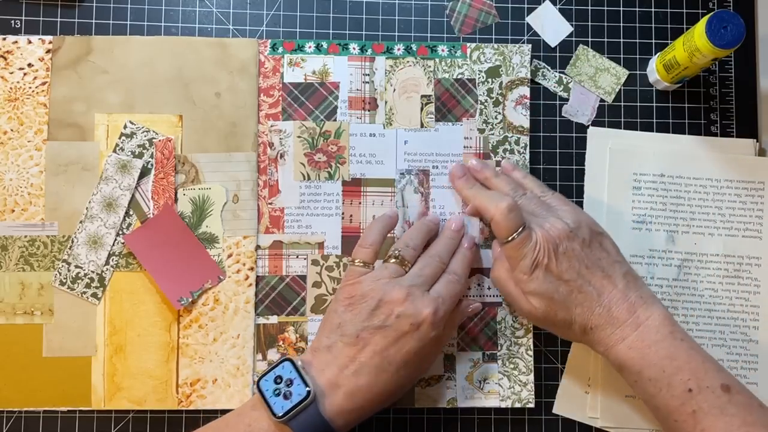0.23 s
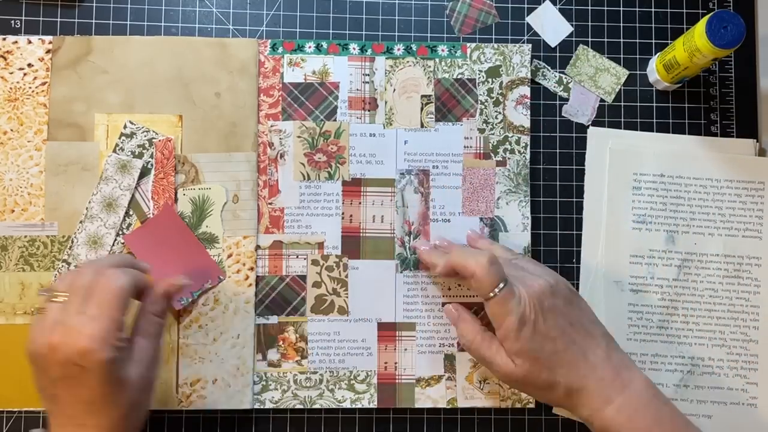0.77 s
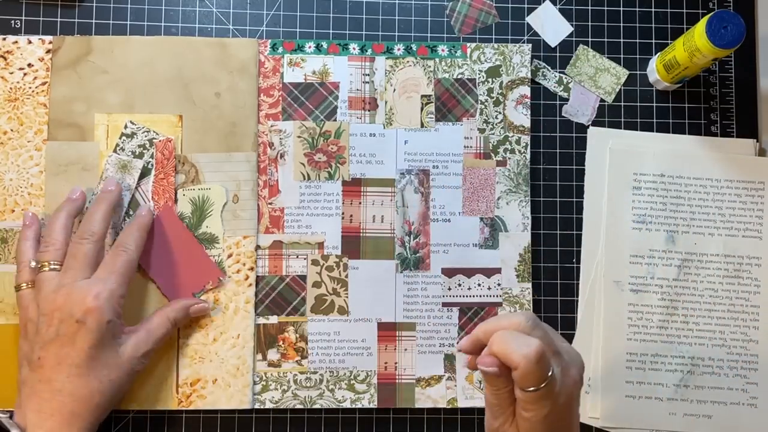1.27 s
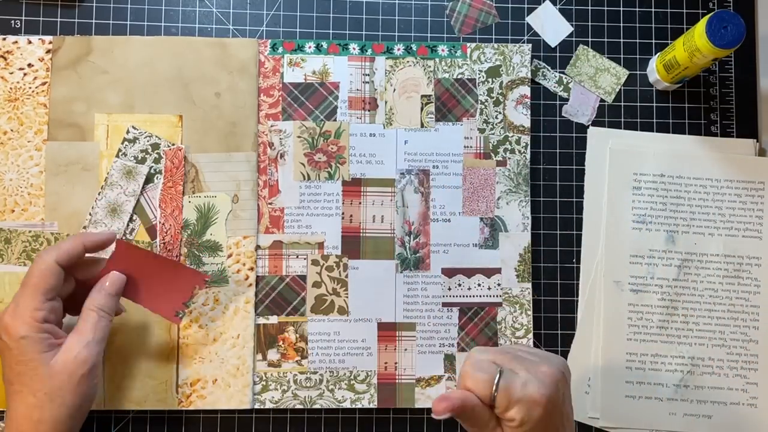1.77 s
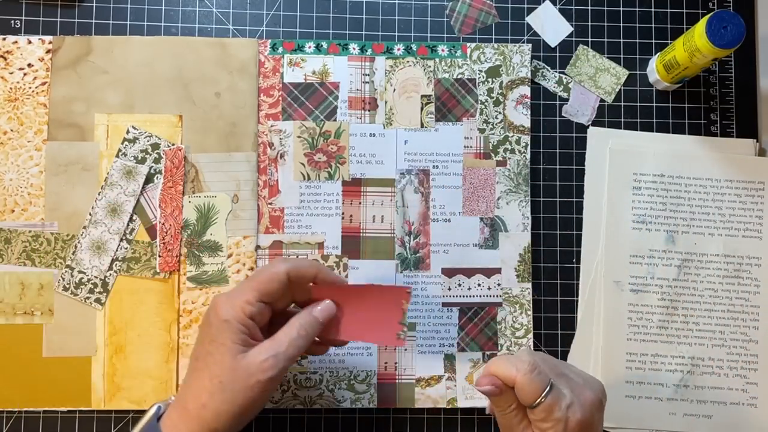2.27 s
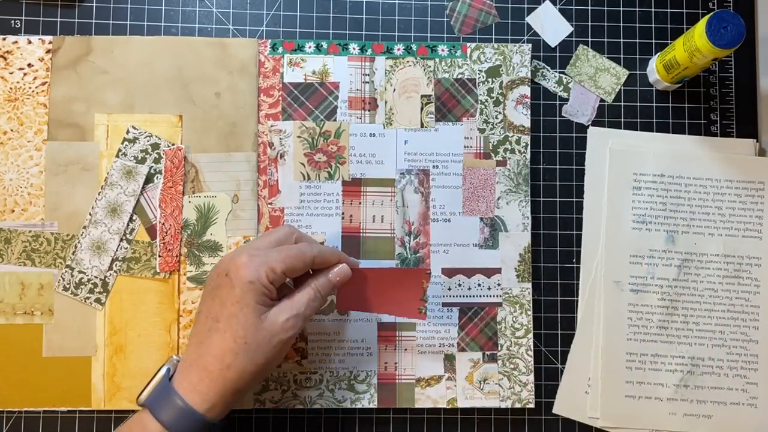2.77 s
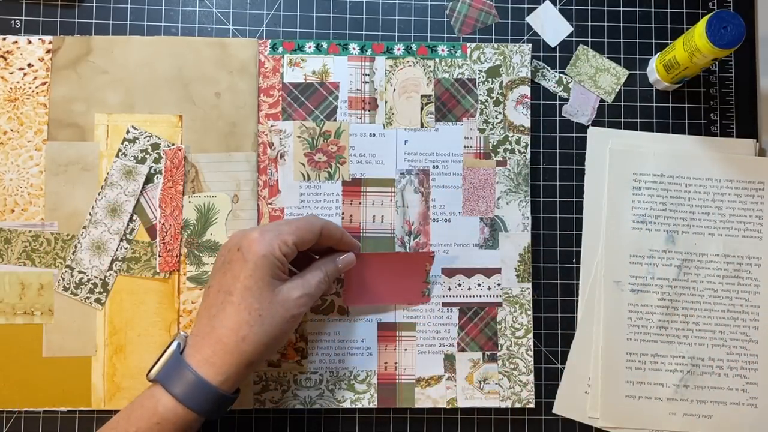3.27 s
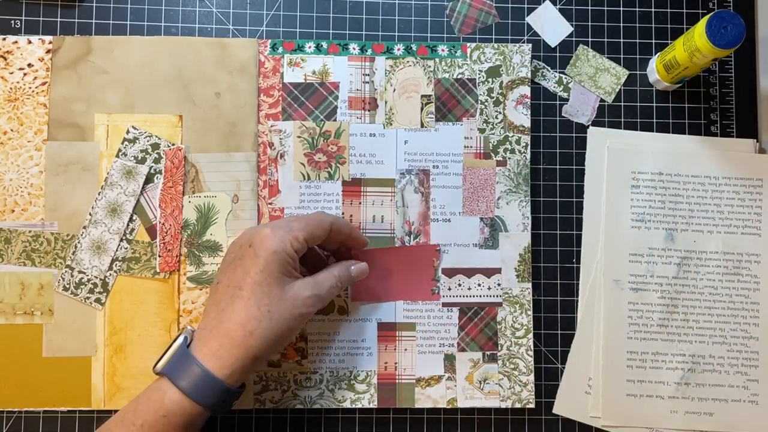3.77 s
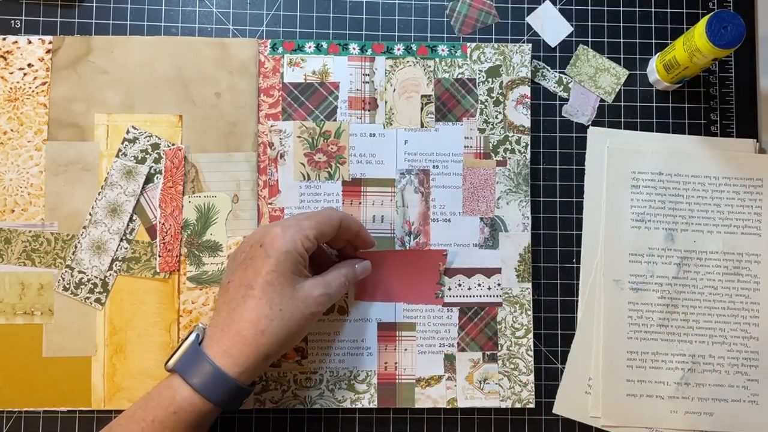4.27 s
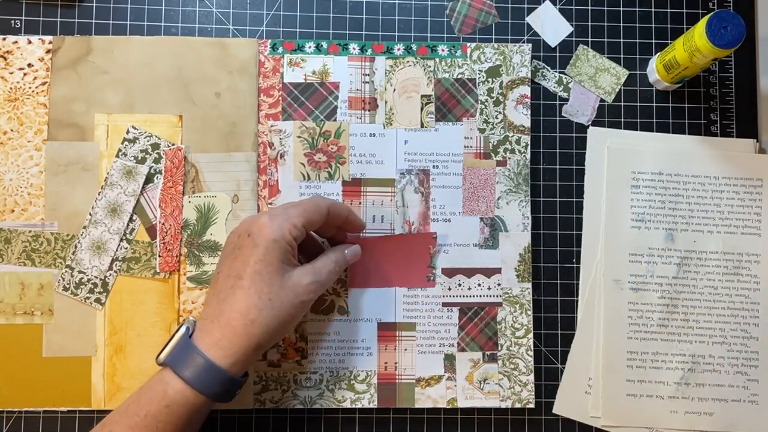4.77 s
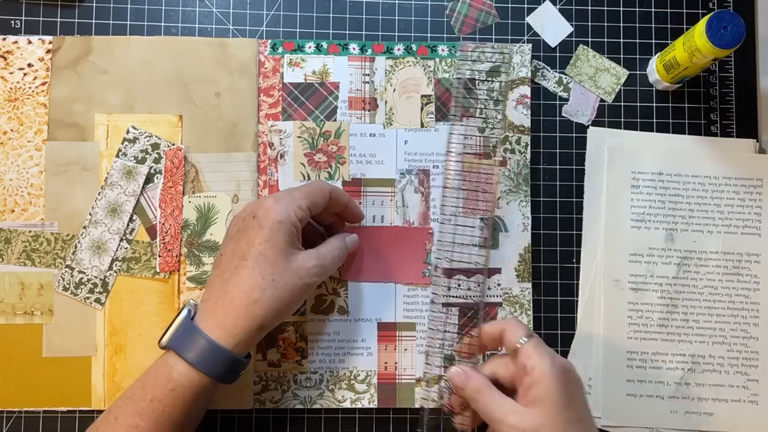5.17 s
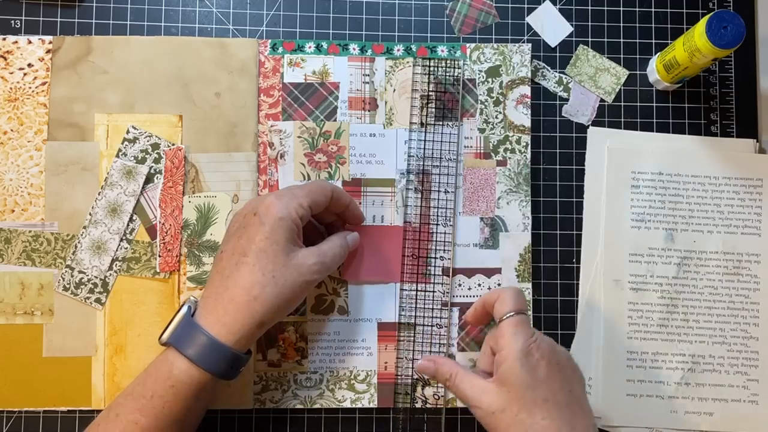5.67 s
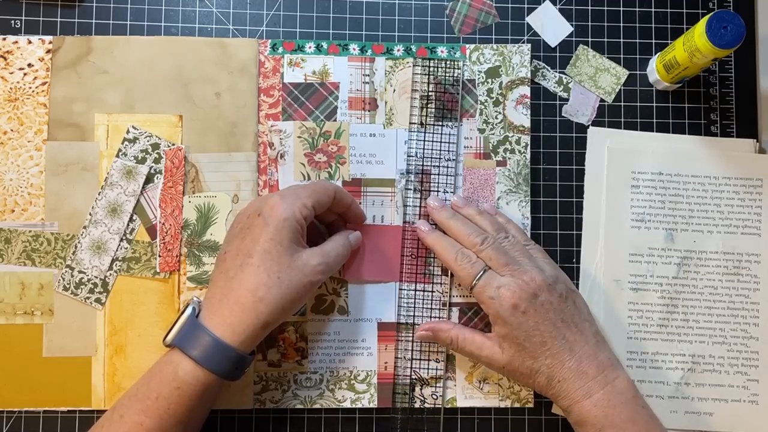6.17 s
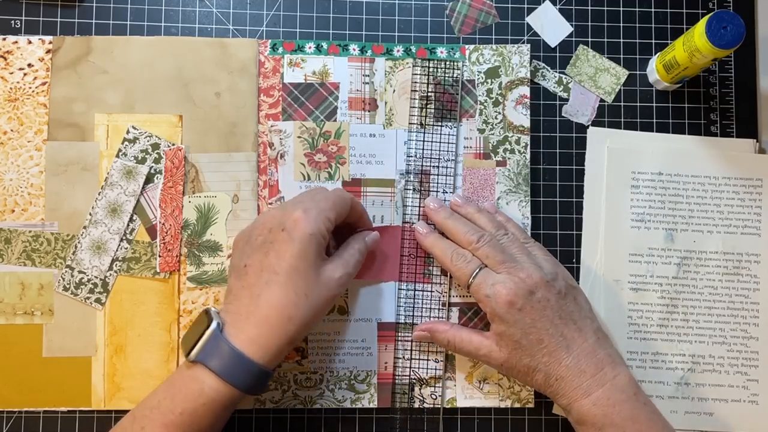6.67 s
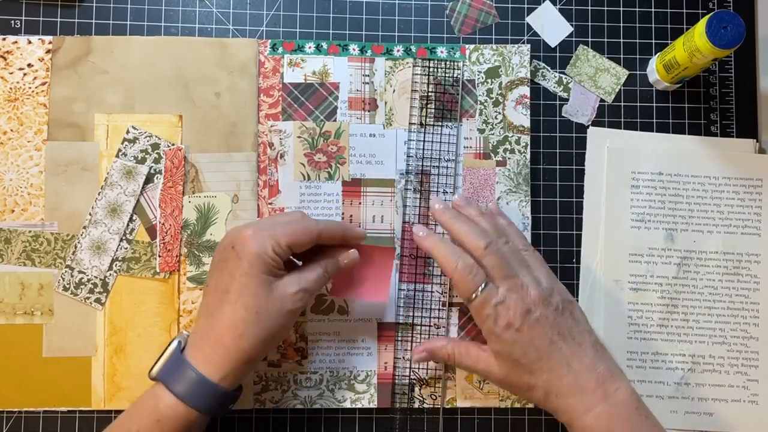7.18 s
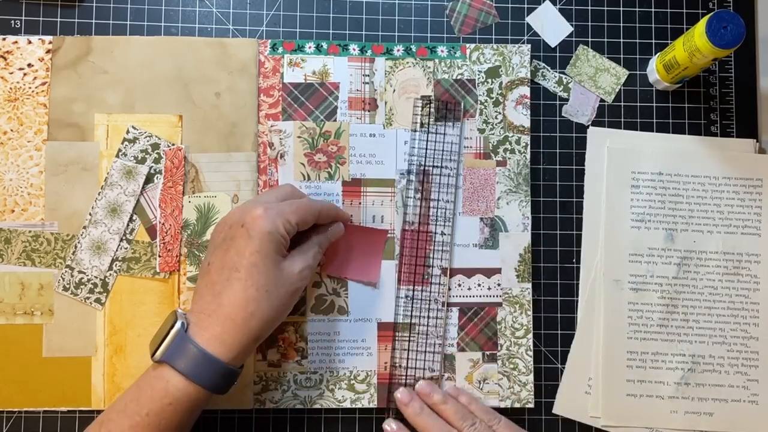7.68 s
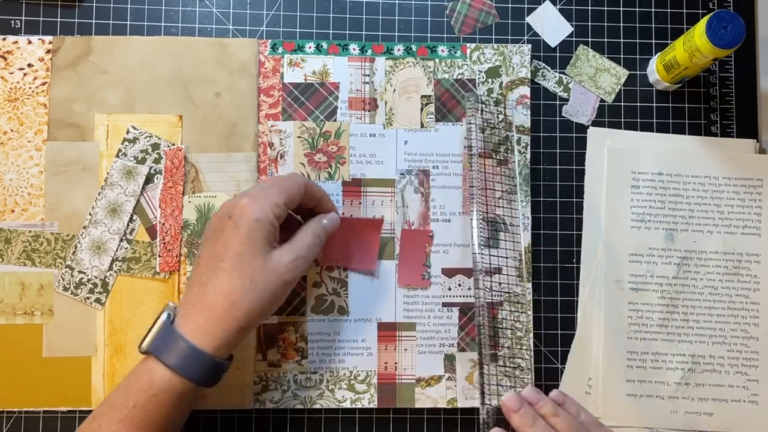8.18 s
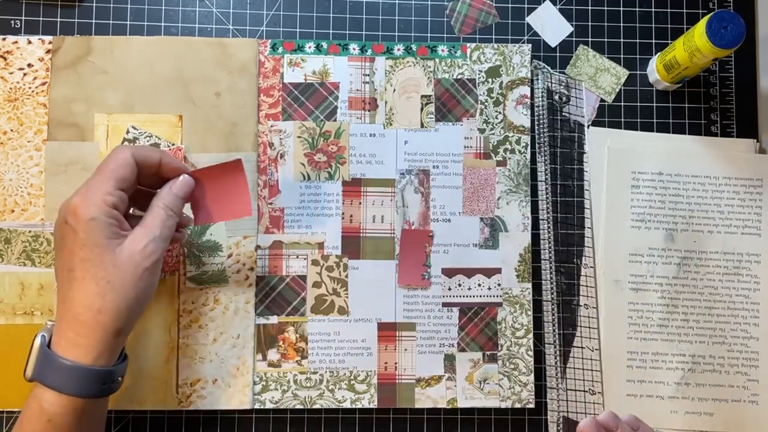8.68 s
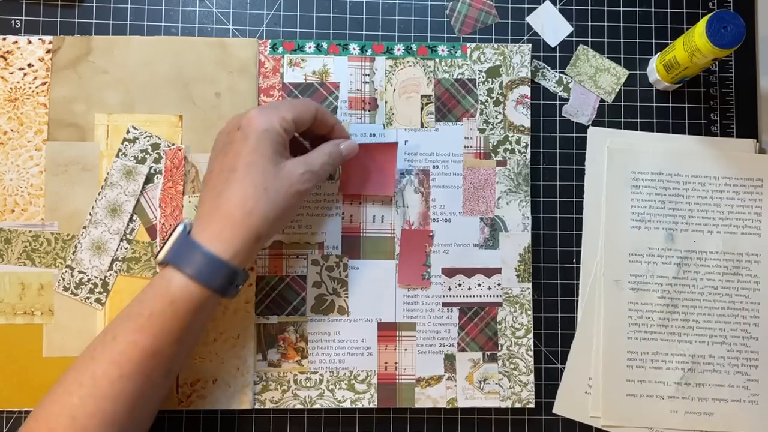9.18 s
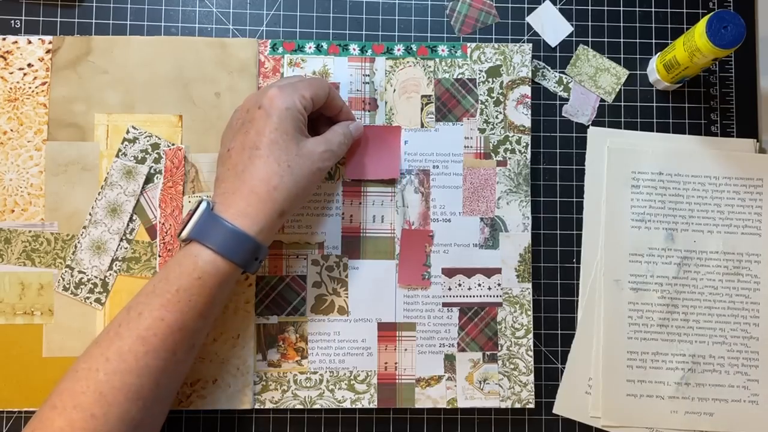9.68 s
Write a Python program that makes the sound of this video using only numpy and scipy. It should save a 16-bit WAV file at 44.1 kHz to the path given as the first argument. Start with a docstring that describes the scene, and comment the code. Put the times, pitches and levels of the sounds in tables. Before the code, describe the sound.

Close papery rubbing, sharp edge clicks and soft knocks, one short strip-tear near seven seconds, then faint slides and a final hard snap.

```python
"""Hands slide paper scraps over a collage page on a craft table, in a small quiet room with a faint hum.
First come slides (coloured noise) with scattered edge snaps, knocks and thuds (short decaying bursts).
Around 3.4 s two hard snaps stand out; a card strip is handled and a plastic ruler is laid on it.
Near 6.9 s the strip is torn off along the ruler: dense clumps of fibre clicks over a ringing card.
Lighter slides, gliding scuffs and faint ticks follow, with one more strong snap near the end."""
import sys
import numpy as np
from scipy import signal
from scipy.fft import rfft, irfft, next_fast_len
from scipy.io import wavfile
from scipy.ndimage import uniform_filter1d, map_coordinates

SR = 44100
rng = np.random.default_rng(int(sys.argv[2]) if len(sys.argv) > 2 else 0)


def unload_audio(sound):
    """Save the sound as a 16-bit wav file, at the path given as the first command line argument."""
    columns = np.transpose(np.atleast_2d(sound))
    # keep every value between -1 and 1, then stretch to whole-number steps
    steps = np.round(np.clip(columns, -1, 1) * 32767)
    wavfile.write(sys.argv[1], SR, steps.astype(np.int16))


N = 438354

# Levels in these tables are before the small trims in the mix.
# low room rumble: hz, level_db (per Hz)
ROOM_AIR = [(20, -26.5), (35, -10.5), (55, 2), (80, 0), (120, -0.5), (170, -9.5), (300, -12), (600, -20.5),
            (1200, -28), (3000, -32), (8000, -32), (13000, -38)]
# a distant appliance, average levels: pitch_hz, level_db
HUM = [(54, -77), (119.6, -75), (180, -95)]
# how long the room's answer takes to fall 60 dB: hz, t60_s
ROOM_DECAY = [(100, 0.46), (600, 0.14), (3000, 0.14), (7000, 0.13), (13000, 0.068)]
# microphone response: hz, gain_db
MICROPHONE = [(20, 0), (8000, 0), (9300, 2), (10400, 5), (11200, 4), (12000, -5), (12800, -15),
              (13600, -25), (15600, -28)]
# phase by which the left channel leads the right: hz, phase_radians
PORT_PHASE = [(100, 0), (1400, -.4), (2400, 0), (3300, .7), (5000, .5), (6800, 0), (8000, .55), (8750, -.2),
              (9400, -1.65), (10300, -3.14), (11700, -6.0), (12600, -6.7), (13300, -9.2)]
# weight landing on the table top: start_s, level_db
THUDS = [(0.065, -62.5), (0.45, -67.5), (2.783, -62.5), (3.423, -44.5), (3.46, -50.5), (3.6, -54.5),
         (4.467, -59.5), (4.669, -60), (5.328, -60.5), (5.635, -50), (6.98, -52.5), (9.44, -58),
         (9.731, -64.5)]
# ways the table top swings, before random detuning: pitch_hz, level_db, t60_s
TABLE_MODES = [(42, -11, .2), (60.03, -4, 0.64), (84, 0.5, 0.084), (109.9, 1, .17), (173.9, 1.5, 0.09),
               (255, -6, 0.13), (357, -7.5, 0.048), (501, -6.5, 0.019)]
# fingers, card and ruler knocking on the page: start_s, level_db (loudest 3 ms), pitch_hz
KNOCKS = [(0.128, -58, 1260), (0.147, -52, 1010), (0.166, -52, 1110), (0.234, -60.5, 590),
          (0.265, -52.5, 716), (1.28, -64, 710), (2.769, -67, 720), (3.38, -46, 1370), (3.4174, -34, 2130),
          (3.42, -35, 950), (3.423, -36, 467), (3.428, -36.5, 520), (3.443, -45, 398), (4.657, -54.5, 1010),
          (4.976, -56.5, 555), (4.977, -63.5, 1600), (5.317, -53.5, 800), (5.616, -48, 770),
          (5.6287, -44, 1420), (5.6267, -41, 552), (6.731, -54.5, 597), (6.838, -47, 655),
          (7.164, -58.5, 890), (7.738, -46.5, 862), (9.431, -55.5, 459), (9.446, -57, 413),
          (9.602, -69.5, 890), (9.696, -50.5, 1400)]
# edges tick faintly as ruler and card are shifted: start_s, end_s
HANDLING = [(5.73, 5.8), (6.345, 6.37), (9.24, 9.27)]
# paper and ruler edges snapping: start_s, crack_db, body_db and ring_db (relative to crack), ring_hz
SNAPS = [(0.1261, -48.5, -11, -16, 4330), (1.278, -51, -14.5, -23, 4390), (1.3234, -42, -28, -24, 5100),
         (1.8936, -60, -1, -3, 5300), (2.6584, -42.5, -20, -6.5, 4340), (2.6683, -38.5, -16, -8.5, 4400),
         (2.7051, -43.5, -30, -3.5, 4150), (2.7691, -46.5, -6, -23, 3860), (3.204, -48.5, -10, -15, 3740),
         (3.3792, -22, -30, -18.5, 4230), (3.4022, -17.5, -27, -21, 4300), (3.4576, -47, -7, -2.5, 3545),
         (4.4757, -36.5, -24, -27, 5010), (4.509, -38.5, -14.5, -29, 5040), (4.5989, -37.5, -21, -8, 4960),
         (4.6964, -47, -8, -5.5, 4530), (4.8966, -40, -22, -5, 4590), (5.2516, -57.5, -12, -4.5, 3480),
         (5.3168, -42, -6.5, -4.5, 4820), (5.3749, -57.5, -14, -2.5, 3620), (5.4685, -36, -21, -10.5, 4140),
         (5.5852, -54.5, -8, 2.5, 4200), (5.6151, -38.5, -8, -7, 3530), (5.6224, -38, -1.5, -9.5, 3600),
         (5.9194, -59, -7.5, -6, 5010), (6.3904, -55, -2.5, -6, 4970), (6.5195, -50, -28, -9.5, 4900),
         (6.565, -45.5, -30, -13, 4900), (6.6393, -40, -23, -18, 3720), (6.731, -50, -5.5, -23, 4270),
         (7.1237, -47, -9, -9, 4100), (7.166, -52, -1.5, -4, 4210), (7.737, -40, -12.5, -13, 4880),
         (7.9962, -56, -25, -0.5, 4600), (8.1723, -57, -22, -1, 5140), (9.424, -40.5, -7, -12.5, 4366),
         (9.4328, -41, -7, -6, 3680), (9.6039, -54, -2.5, -15, 3540), (9.695, -27.5, -11.5, -3.5, 4040)]
# bright part of a snap: hz, level_db
CRACK_SPECTRUM = [(1500, -31), (3500, -17), (5500, -2.5), (7000, 1), (9000, -1), (11500, -2.5), (14000, -4)]
# duller flap of the sheet: hz, level_db
FLAP_SPECTRUM = [(200, -19.5), (700, -11), (1400, -1.5), (2800, 3.5), (4000, -4), (8000, -19.5)]
# a bending scrap scuffs past: start_s, end_s, level_db, from_hz, to_hz, width_octaves
SCUFFS = [(1.403, 1.689, -63, 7000, 3280, 0.54), (1.624, 1.824, -77.5, 3100, 2390, 0.26),
          (2.216, 2.283, -65.5, 3400, 3620, 0.44), (2.286, 2.428, -70.5, 2180, 1950, 0.28),
          (3.381, 3.419, -47, 770, 493, 1.4), (3.523, 3.63, -61, 744, 643, 0.61),
          (6.412, 6.457, -65.5, 5470, 6960, 0.37), (7.26, 7.41, -77, 4460, 5500, 0.48),
          (6.111, 6.19, -79, 7000, 7000, 0.99), (8.014, 8.063, -62.5, 2500, 3140, 0.64),
          (8.09, 8.204, -64.5, 6140, 4340, 0.53), (8.177, 8.332, -72.5, 4640, 4100, 0.33),
          (8.409, 8.485, -63, 4480, 4440, 0.81), (8.665, 8.906, -78.5, 4584, 4880, 0.66),
          (8.949, 9.08, -71.5, 5040, 5750, 0.4), (9.096, 9.194, -71, 3960, 4200, 0.67),
          (9.232, 9.279, -73, 4600, 4080, 0.3), (9.417, 9.477, -62, 1770, 890, 1.6),
          (9.674, 9.725, -62.5, 4200, 4140, 0.26)]
# a scrap or hand slides: start_s, end_s, hiss_db, swell_db (change over the stroke), rustle_db (re hiss)
SLIDES = [(0.0, 0.135, -68.5, -1.5, -7.5), (0.137, 0.421, -59, -3.5, -15.5), (0.426, 0.598, -59, 6, -16),
          (0.608, 0.756, -55.5, 0.5, -17.5), (0.981, 1.044, -62.5, -5, -11.5),
          (1.283, 1.377, -62.5, 5, -8.5), (1.405, 1.654, -61, -10, -18), (1.655, 1.725, -78, 0, -4),
          (1.73, 1.81, -69.5, 2, -18), (1.834, 1.951, -73.5, -8, -13), (1.946, 2.068, -85.5, -9, -9),
          (2.202, 2.414, -65.5, -9, -6.5), (2.412, 2.532, -75, 5, -2), (2.606, 2.858, -67, 8, -1),
          (2.873, 3.145, -67, -5, -6), (3.152, 3.206, -58, -4.5, -4), (3.266, 3.331, -80, 1, 4),
          (3.45, 3.608, -65, 9, -3), (3.608, 3.679, -56, -3.5, -3), (3.71, 3.85, -63.5, -2, -6),
          (3.849, 3.982, -84, -3, 4), (4.33, 4.433, -75, -3, -1.5), (4.424, 4.675, -61.5, 10.5, -2),
          (4.704, 4.877, -79, -15, 2), (4.885, 4.99, -76.5, -2, -3.5), (5.11, 5.163, -74, 7, -9),
          (5.313, 5.58, -77, -5, -3), (5.575, 5.64, -63, -3, -9), (5.926, 5.988, -69.5, -3.5, -9),
          (6.412, 6.474, -71, 0, -6), (6.511, 6.769, -64.5, 0.5, -8), (7.087, 7.184, -61.5, -4.5, -9),
          (7.197, 7.228, -72, -2, -2), (7.403, 7.527, -67.5, -5, -1.5), (7.524, 7.774, -60.5, -2.5, -6),
          (7.778, 7.892, -66, 4.5, -7), (7.896, 7.981, -79.5, -2, -3), (8.212, 8.264, -74, 0.5, -2.5),
          (8.376, 8.476, -71.5, 11.5, -11), (8.609, 8.645, -75, -3.5, -2.5), (8.98, 9.058, -72, 1, -6.5),
          (9.319, 9.367, -68.5, 2, -4), (9.45, 9.7, -73.5, -2, -6.5), (9.691, 9.777, -63.5, -11, -9.5)]
# the hand presses down and rubs: middle_s, length_s, level_db
PRESSES = [(0.155, 0.27, -69.5), (0.467, 0.16, -79), (1.323, 0.16, -78.5), (2.788, 0.11, -63.5),
           (3.186, 0.048, -71), (3.564, 0.27, -55.5), (3.745, 0.21, -78), (4.465, 0.07, -68.5),
           (4.674, 0.066, -59.5), (5.622, 0.16, -70.5), (6.419, 0.085, -74), (7.455, 0.15, -70),
           (7.657, 0.39, -68)]
# high smooth part of a slide: hz, level_db (per Hz)
HISS_SPECTRUM = [(1500, -37.5), (3000, -11), (4800, -5.5), (7000, 0.5), (9000, 2.5), (11500, -0.5),
                 (13000, -13.5)]
# middle, grainier part of a slide: hz, level_db (per Hz)
RUSTLE_SPECTRUM = [(500, -30), (1000, -8.5), (1600, -0.5), (2500, -1), (4000, 0.5), (6000, -5.5),
                   (10000, -34)]
# low rub of the hand: hz, level_db (per Hz)
RUB_SPECTRUM = [(100, -18.5), (300, -2), (650, 1), (1000, -8), (1600, -10), (4000, -31.5)]
# fibres breaking in the tear: hz, level_db (per Hz)
FIBRE_SPECTRUM = [(60, -35.5), (250, -15.5), (600, -16.5), (1000, -13), (1500, -12.5), (2200, -5.5),
                  (3500, -0.5), (5000, -2), (7500, 2.5), (10000, 1.5), (12000, 4.5), (15000, 0.5)]
# resonances of the tearing edge: pitch_hz, width_hz, peak_db
TORN_EDGE = [(3163, 190, 4.5), (6030, 190, 7), (9200, 940, 4.5)]
# resonances of the freed card and the page under it: pitch_hz, width_hz, level_db
CARD_MODES = [(106, 8.5, 1), (394, 47, -12.5), (667, 74, 1), (803, 27, -12.5)]

TOP_HZ = 15900  # nothing is picked up above this
TICK_GAP_S, TICK_DB, TICK_SPREAD_DB = 0.032, -67.5, 5.5
# decay of a snap at the reference level; one harder by the halving step is half as long
SNAP_T60_S, SNAP_REF_DB, SNAP_HALVING_DB = .016, -41, 32.5
SHIVER_DB, SHIVER_T60_S = -22.5, 0.11  # the sheet shivers on after the crack
CRACKLE_S, CRACKLE_DB = .022, -24  # smaller cracks start within this time, about this much weaker
RING_WIDTH_HZ, RING_LONGER = 320, 1.7  # band reach on each side; times as long as the crack
SLIDE_ATTACK_S, SLIDE_RELEASE_S = 0.034, .05  # a stroke gets under way and comes to rest
DRAG_DB = -22  # rub added to each stroke, relative to its hiss before the mix trims
TEAR_START_S, TEAR_END_S = 6.836, 6.986
TEAR_FIRST_DB, TEAR_FULL_DB = -43, -25  # pull as the edge gives; the level it builds towards
TEAR_BUILD_S, TEAR_T60_S = .08, 0.035  # the pull gathers speed; the last fibres let go


def amp(db):
    """Turn decibels into a gain."""
    return 10 ** (np.asarray(db) / 20)


def unit(x):
    """Scale to an average strength (rms) of 1."""
    return x / np.sqrt(np.mean(x ** 2) + 1e-20)


def along(points, hz):
    """Read a value between (hz, value) points on a log frequency axis."""
    point_hz, values = np.transpose(points)
    return np.interp(np.log(hz + 1), np.log(point_hz + 1), values)


def wobble(rate):
    """A smooth random curve with rate random points a second."""
    points = rng.standard_normal(int(N * rate / SR) + 4)
    return map_coordinates(points, [np.arange(N) * rate / SR])


def filtered(x, response):
    """Shape a sound with a gain that depends on frequency."""
    size = next_fast_len(N + SR // 2)
    shaped = rfft(x, size) * response(np.fft.rfftfreq(size, 1 / SR))
    return irfft(shaped, size)[..., :N]


def colour(spectrum, hz, modes=()):
    """Gain of a broad spectrum with resonances standing on it."""
    peaks = sum((amp(db) - 1) / (1 + (2 * (hz - f) / width) ** 2) for f, width, db in modes)
    return amp(along(spectrum, hz)) * (1 + peaks)


def burst(response, t60, size=4096):
    """A dying puff of filtered noise; its loudest 3 ms have rms 1."""
    # folding the cepstrum makes a filter that never sounds before its input
    cepstrum = irfft(np.log(np.maximum(response(np.fft.rfftfreq(size, 1 / SR)), 1e-6)))
    cepstrum[1:size // 2] *= 2
    cepstrum[size // 2 + 1:] = 0
    t = np.arange(size) / SR
    fade = amp(-60 * t / max(t60, .002))
    onset = (1 - np.exp(-t / .0008)) ** 2
    puff = rng.standard_normal(size) * fade * onset
    x = irfft(rfft(puff) * np.exp(rfft(cepstrum)))
    return x / np.sqrt(uniform_filter1d(x * x, size=132).max())


def add(track, s, x):
    """Mix x into the track at time s."""
    part = track[max(round(s * SR), 0):][:len(x)]
    part += x[:len(part)]


def grains(rate, spread_db, smooth):
    """Tiny fibre slips of uneven size, about rate a second, with a share of smooth noise."""
    sizes = amp(spread_db * np.minimum(rng.exponential(size=N), 4))
    sizes = sizes * rng.choice([-1, 1], N)
    slips = unit(sizes * (rng.random(N) < rate / SR))
    return unit(slips + smooth * rng.standard_normal(N))


def patchy(x, depth_db, size):
    """Passing resonances as the sheet bends; size is one patch in (frequency bins, time frames)."""
    z = signal.stft(x, nperseg=256)[2]
    field = uniform_filter1d(rng.standard_normal(z.shape), size[0], 0)
    field = uniform_filter1d(field, size[1], 1)
    return signal.istft(z * amp(depth_db * unit(field)), nperseg=256)[1][:N]


def friction(spectrum, rate, spread_db, patchy_db):
    """Rubbing paper: fibre slips coloured by the sheet, rms 1."""
    slips = patchy(grains(rate, spread_db, smooth=1.0), patchy_db, size=(4, 24))
    return unit(filtered(slips, lambda hz: colour(spectrum, hz)))


def background():
    """Low room rumble from filtered noise, and a hum whose tones waver in level and phase."""
    t = np.arange(N) / SR
    hum = np.zeros(N)
    air = unit(filtered(rng.standard_normal(N), lambda hz: colour(ROOM_AIR, hz)))
    for hz, db in HUM:
        level = amp(db + 1.5 * wobble(4.4)) * np.sqrt(2)
        hum += level * np.sin(2 * np.pi * hz * t + 0.87 * wobble(6.7))
    return amp(-72.5) * air + hum


def room(x, channels):
    """The small room's scattered answer: a dying noise tail per channel, starting after 4 ms."""
    hz, t, z = signal.stft(rng.standard_normal((channels, SR // 2)), SR, nperseg=256)
    decay = amp(-60 * t / along(ROOM_DECAY, hz)[:, None])
    tail = signal.istft(z * decay, SR, nperseg=256)[1]
    tail = np.pad(tail, ((0, 0), (round(.004 * SR), 0)))
    return signal.fftconvolve(x[None], tail / np.linalg.norm(tail[0]), axes=1)[:, :N]


def thuds():
    """The table top swings briefly under each soft load, as dying sines with slightly random pitch."""
    track, t = np.zeros(N), np.arange(SR // 2) / SR
    onset = 1 - np.exp(-t / 0.0042)
    for s, db in THUDS:
        ring = np.zeros(len(t))
        for hz, level, t60 in TABLE_MODES:
            fade = amp(level + rng.normal(0, 1.6) - 60 * t / t60)
            ring += fade * np.sin(2 * np.pi * hz * rng.normal(1, 0.043) * t)
        add(track, s, amp(db + 5) * ring * onset)
    return track


def knocks():
    """Damped blows on the layered page, each a noise burst in one broad band."""
    track = np.zeros(N)
    for s, db, pitch_hz in KNOCKS:
        band = lambda hz: 1 / (1 + (2.0 * np.log2((hz + 1) / pitch_hz)) ** 2) ** 1.3
        add(track, s, amp(db) * burst(band, t60=0.0081))
    return track


def ticks():
    """Faint edge ticks: short bursts around 4900 Hz at uneven intervals."""
    track = np.zeros(N)
    band = lambda hz: 1 / (1 + (1.5 * np.log2((hz + 1) / 4900)) ** 2)
    for start, end in HANDLING:
        for s in np.arange(start, end, TICK_GAP_S):
            tick = burst(band, SNAP_T60_S)
            level = amp(TICK_DB + TICK_SPREAD_DB * rng.normal())
            add(track, s + TICK_GAP_S * rng.random() / 2, level * tick)
    return track


def crackle(t60, count=3):
    """A few smaller cracks at random moments as the sheet settles."""
    track = np.zeros(SR // 4)
    both = lambda hz: colour(CRACK_SPECTRUM, hz) + .5 * colour(FLAP_SPECTRUM, hz)
    for delay, size in rng.random((count, 2)):
        add(track, CRACKLE_S * delay, (.5 + size) * burst(both, t60))
    return track


def snaps():
    """An edge slips free: a bright crack, a ring of the stiff edge, a duller flap and a shiver."""
    track = np.zeros(N)
    bright = lambda hz: colour(CRACK_SPECTRUM, hz)
    dull = lambda hz: colour(FLAP_SPECTRUM, hz)
    for s, db, body_db, ring_db, ring_hz in SNAPS:
        t60 = SNAP_T60_S * 2 ** ((SNAP_REF_DB - db) / SNAP_HALVING_DB)
        ring_band = lambda hz: 1 / (1 + ((hz - ring_hz) / RING_WIDTH_HZ) ** 2) ** 0.64
        snap = amp(-6.5) * burst(bright, t60)
        snap += amp(ring_db - 3.0) * burst(ring_band, RING_LONGER * t60)
        snap += amp(body_db - 4.5) * burst(dull, t60)
        snap += amp(SHIVER_DB) * burst(bright, SHIVER_T60_S)
        add(track, s, amp(db) * snap)
        # above the reference level the crackle grows only half as fast as the snap
        crackle_db = min(db, SNAP_REF_DB) / 2 + db / 2 + CRACKLE_DB
        add(track, s, amp(crackle_db) * crackle(t60))
    return track


def scuffs():
    """A bending scrap: each scuff swells and fades while its band of grainy noise glides."""
    track = np.zeros(N)
    slips = patchy(grains(rate=4100, spread_db=4.2, smooth=0.48), depth_db=3.0, size=(2, 10))
    slips = slips * amp(1.8 * wobble(70))
    for start, end, db, from_hz, to_hz, width in SCUFFS:
        piece = slips[round(start * SR):][:max(round((end - start) * SR), 512)]
        hz, _, z = signal.stft(piece, SR, nperseg=256)
        octaves = np.log2((hz[:, None] + 1) / np.geomspace(from_hz, to_hz, z.shape[1]))
        gliding = z / (1 + (octaves / width) ** 2) ** 0.89
        band = signal.istft(gliding, SR, nperseg=256)[1][:len(piece)]
        add(track, start, amp(db) * unit(band) * signal.windows.tukey(len(band), .7))
    return track


def stroke(start, end, swell_db):
    """Gain of one stroke: it gets under way, swells or slackens evenly, and comes to rest."""
    t = np.arange(N) / SR
    rise = np.clip((t - start) / SLIDE_ATTACK_S + .5, 0, 1)
    fall = np.clip((end - t) / SLIDE_RELEASE_S + .5, 0, 1)
    on = np.flatnonzero(rise * fall)
    swell = amp(swell_db * ((t[on] - start) / (end - start) - .5))
    return on, rise[on] * fall[on] * swell


def slides():
    """Scraps and fingers rub the page with a slightly uneven grip; a pressing hand adds a low rub."""
    hiss, rustle, rub = np.zeros((3, N))
    for start, end, db, swell_db, rustle_db in SLIDES:
        on, gain = stroke(start, end, swell_db)
        hiss[on] += amp(db) * gain
        rustle[on] += amp(db + rustle_db) * gain
    for middle, length, db in PRESSES:
        add(rub, middle - length / 2, amp(db) * np.hanning(round(length * SR)))
    rub = rub + amp(DRAG_DB) * hiss
    grip = amp(1.2 * wobble(70) + 0.61 * wobble(16))
    rubbing = amp(0.5) * hiss * friction(HISS_SPECTRUM, rate=3000, spread_db=1.5, patchy_db=3.0)
    rubbing += amp(0.5) * rustle * friction(RUSTLE_SPECTRUM, rate=1100, spread_db=4.0, patchy_db=4.0)
    rubbing += amp(-2.0) * rub * friction(RUB_SPECTRUM, rate=400, spread_db=6, patchy_db=1.5)
    return grip * rubbing


def pull():
    """Loudness of the tear: it starts at once, gathers speed and dies away as the strip comes free."""
    t = np.arange(N) / SR
    speed = 1 - np.exp(-np.maximum(t - TEAR_START_S, 0) / TEAR_BUILD_S)
    level = amp(TEAR_FIRST_DB) * (1 - speed) + amp(TEAR_FULL_DB) * speed
    letting_go = amp(-60 * np.maximum(t - TEAR_END_S, 0) / TEAR_T60_S)
    return (t > TEAR_START_S) * level * letting_go


def card_ring(hz):
    """Card and page answer the breaking fibres like a few damped springs."""
    return sum(amp(db) * 1j * hz * w / (f * f - hz * hz + 1j * hz * w) for f, w, db in CARD_MODES)


def tear():
    """Fibres break in quick clumps along the ruler; the card rings more as more of it comes free."""
    clumps = amp(1.05 * wobble(350) + 1.2 * wobble(110))
    breaks = grains(rate=4500, spread_db=2.0, smooth=0.27) * clumps
    rip = patchy(breaks, depth_db=3.5, size=(5, 6))
    rip = unit(filtered(rip, lambda hz: colour(FIBRE_SPECTRUM, hz, TORN_EDGE)))
    freed = np.interp(np.arange(N) / SR, [TEAR_START_S, TEAR_END_S], [0, 1])
    card = unit(filtered(breaks, card_ring)) * amp(-14 + 6 * freed)
    return pull() * (amp(2.47) * rip + card)


def scene():
    """Paper, table and room are almost alike in both channels; the treble spreads wider than the bass."""
    paper = slides() + scuffs() + tear() + snaps() + knocks() + ticks()
    low = thuds() + background()
    bass_cut = lambda hz: hz / np.hypot(hz, 260)
    diffuse = room(filtered(amp(-13) * paper + amp(-16) * low, bass_cut), channels=2)
    return paper + low + amp(-13.0) * room(paper, channels=1) + diffuse


def record(dry):
    """A stereo microphone with a treble peak, a phase shift between channels and a band limit."""
    sides = np.array([[1], [-1]])  # left, right
    ports = lambda hz: np.exp(.5j * sides * along(PORT_PHASE, hz))
    response = lambda hz: ports(hz) * colour(MICROPHONE, hz) * (hz < TOP_HZ)
    return filtered(dry * amp(0.17 * sides), response)  # left is slightly louder


dry = scene()
out = record(dry)
unload_audio(out)
```